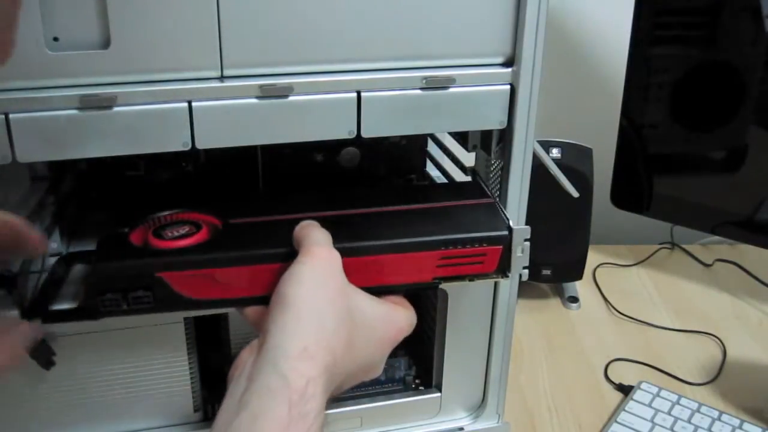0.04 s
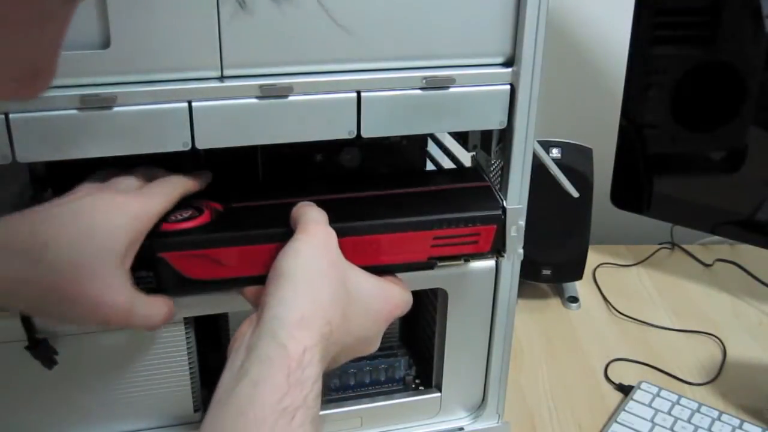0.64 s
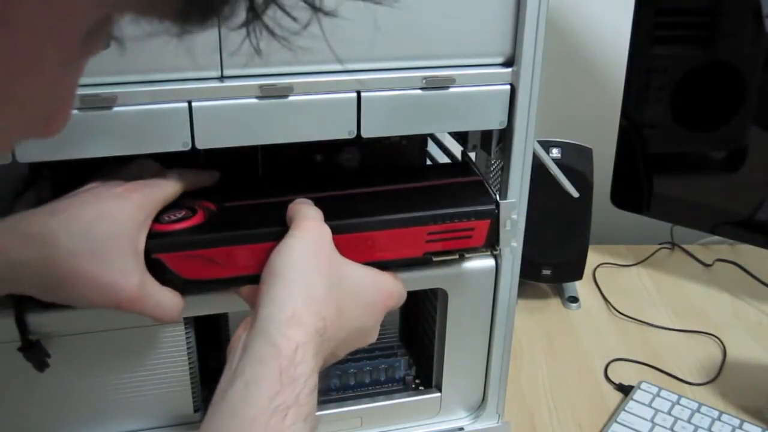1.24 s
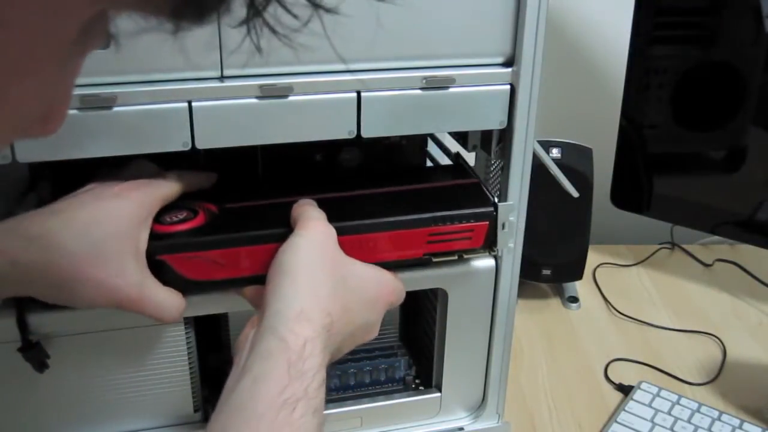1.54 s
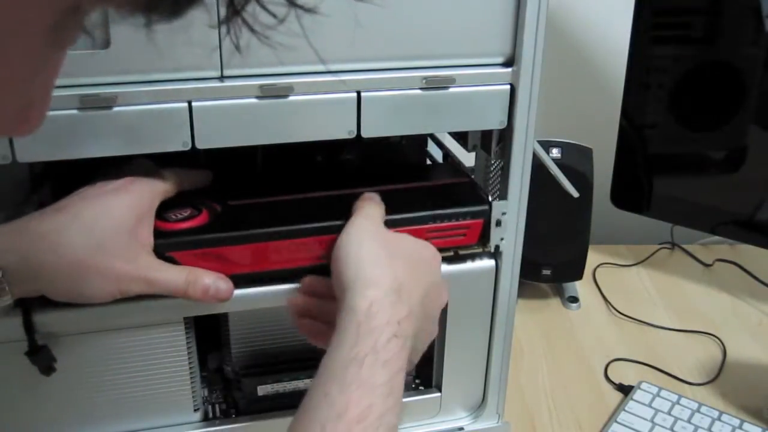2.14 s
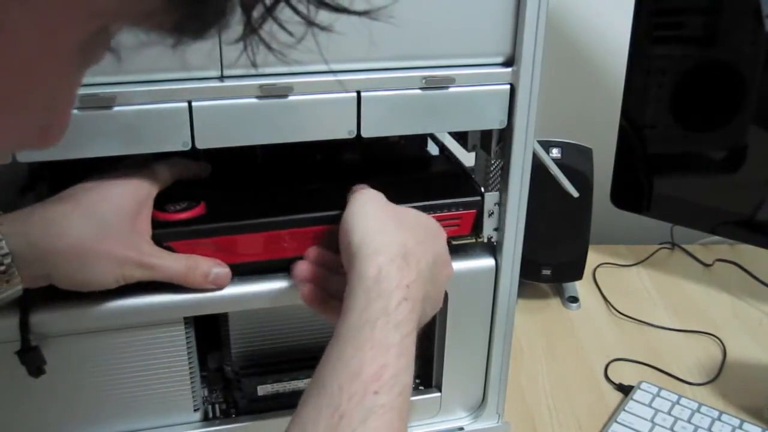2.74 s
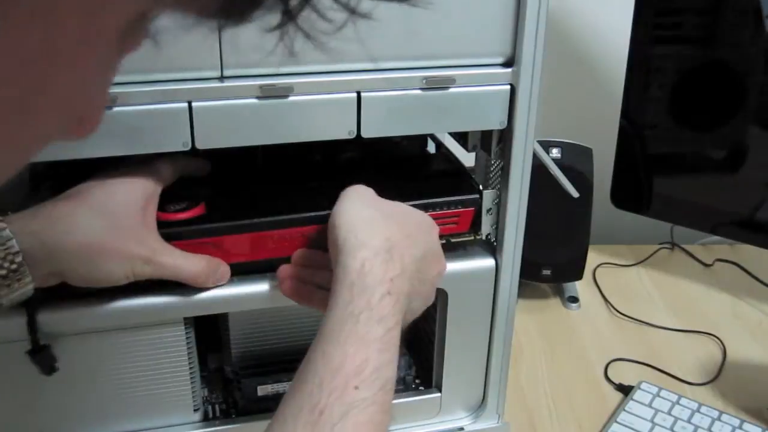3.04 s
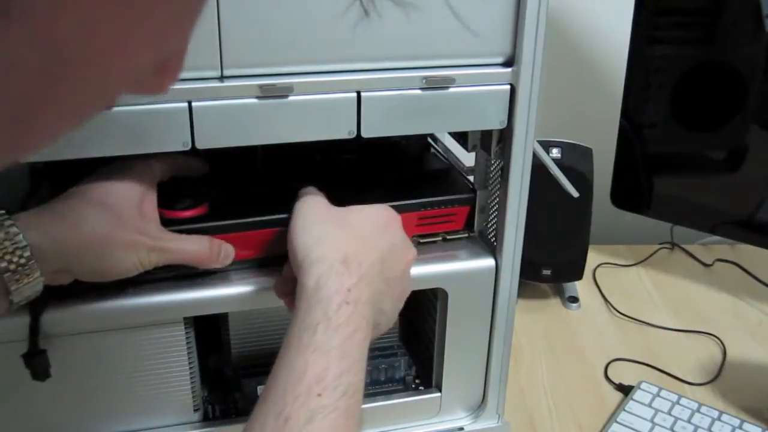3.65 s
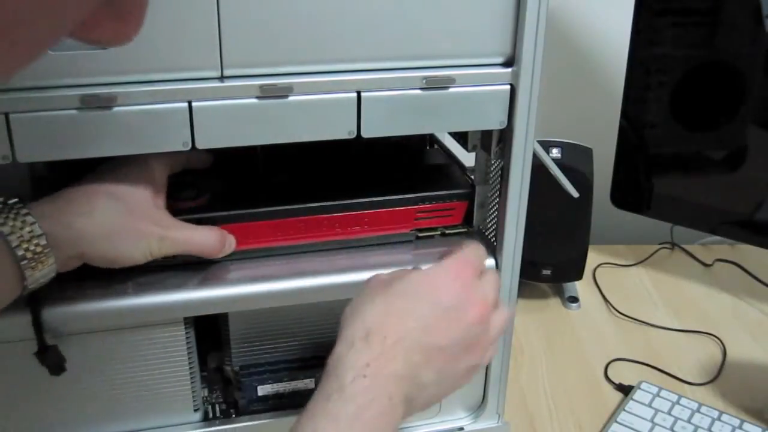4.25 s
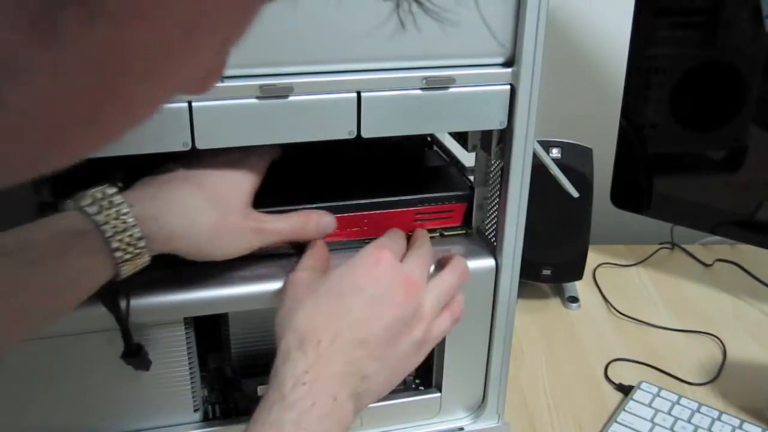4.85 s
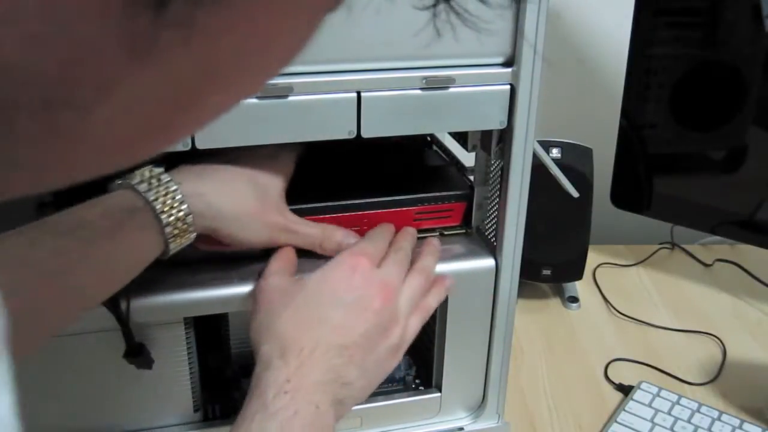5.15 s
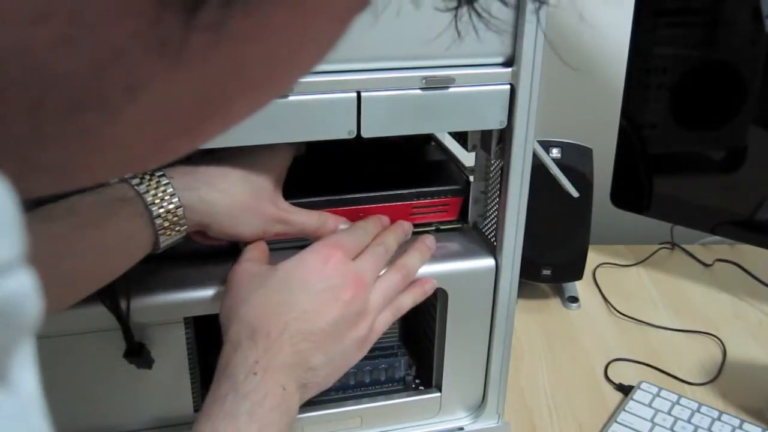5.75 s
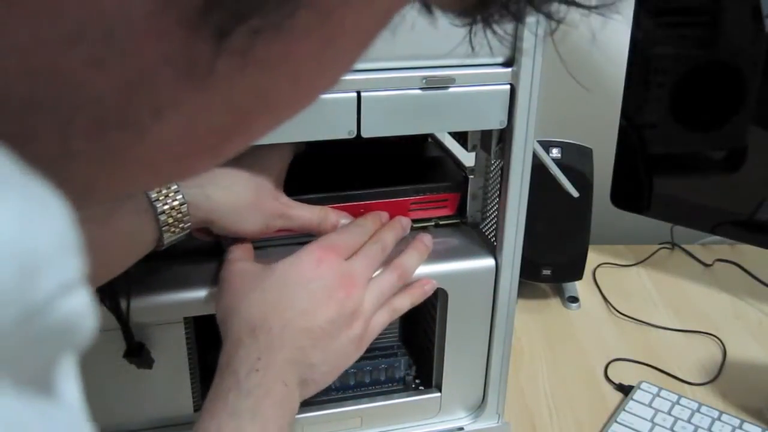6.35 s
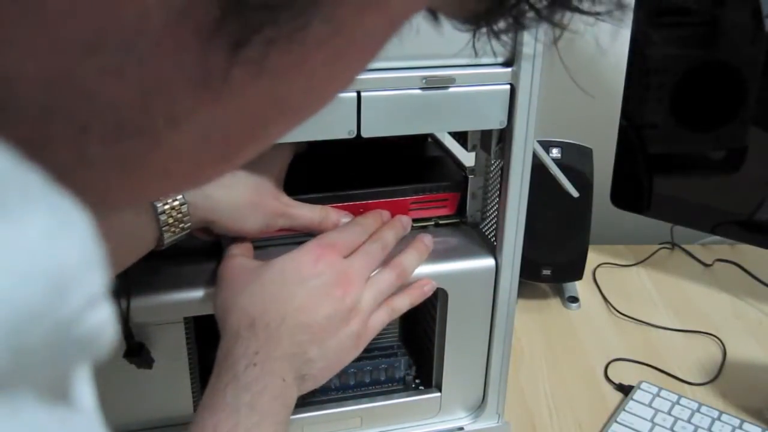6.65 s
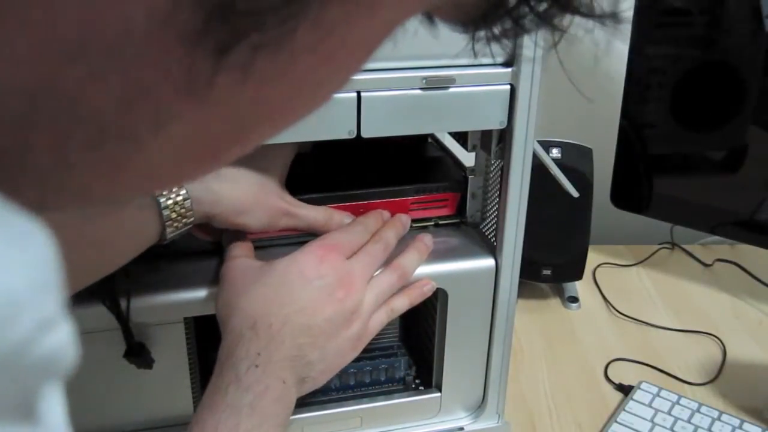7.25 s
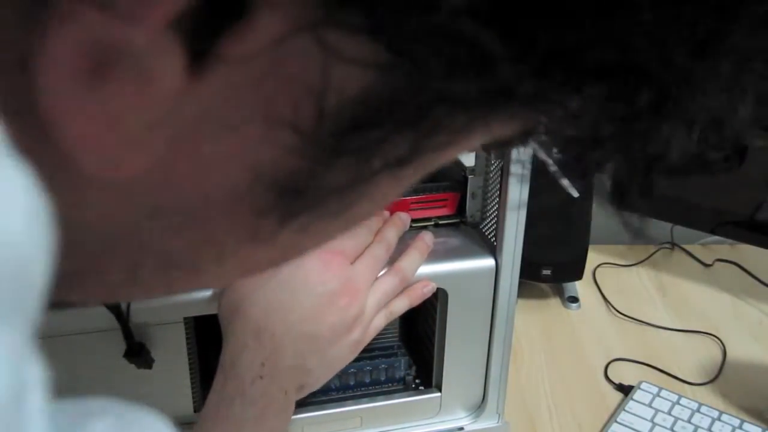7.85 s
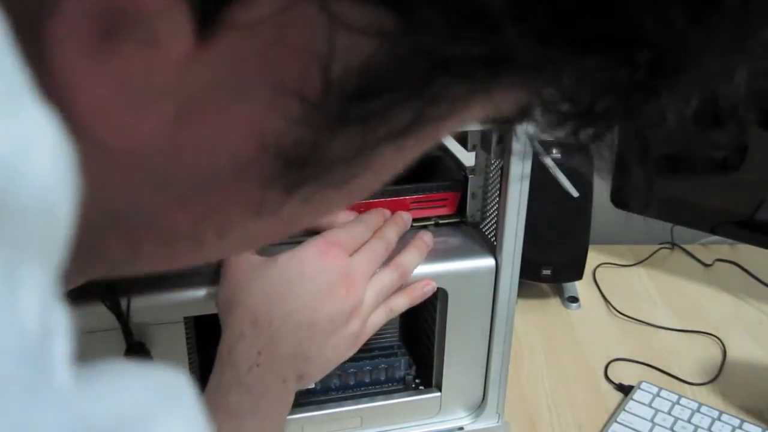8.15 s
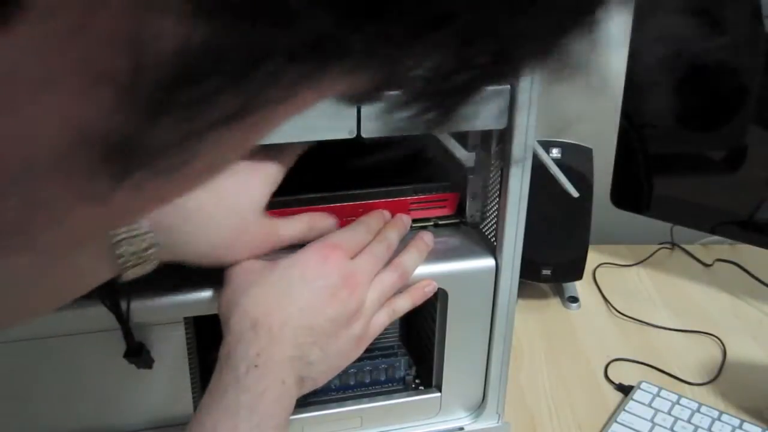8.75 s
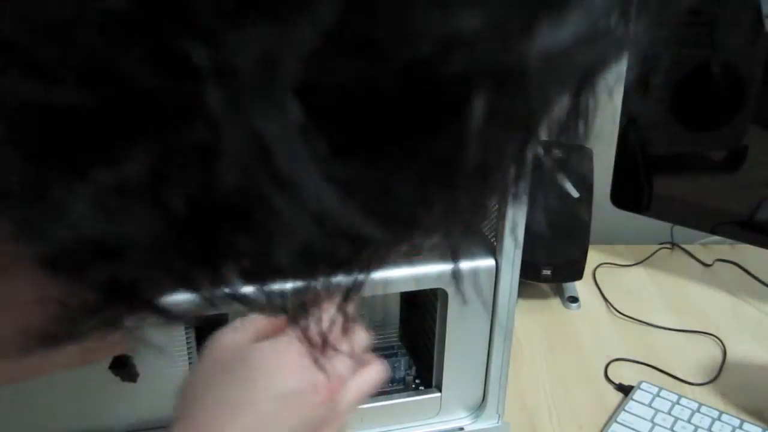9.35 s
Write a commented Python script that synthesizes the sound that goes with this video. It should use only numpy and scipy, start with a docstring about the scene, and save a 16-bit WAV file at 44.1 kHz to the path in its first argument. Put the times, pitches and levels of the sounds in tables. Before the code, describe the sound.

A graphics card is worked into a metal computer case. Light, uneven knocks and short scrapes come first, then sharper clicks and loud snaps from its steel bracket, each leaving a brief hollow ring in the case. After a quieter stretch with tiny squeaks, harder knocks follow, ending in a loud cluster of clacks. It sounds close by, in a quiet room with a faint fan hum and thin high tones.

```python
"""Fitting a graphics card into an aluminium case

The card knocks and scrapes on the casing, its steel bracket clicks and squeaks, and each contact
excites the modes of the hollow case. A harder touch reaches higher in frequency; more weight behind
it adds bass. A fan hums faintly in the room, and a limiter ducks the hardest snaps."""
import sys
import numpy as np
from scipy import signal
from scipy.fft import rfft, irfft
from scipy.io import wavfile
from scipy.ndimage import uniform_filter1d

SR = 44100
rng = np.random.default_rng(int(sys.argv[2]) if len(sys.argv) > 2 else 0)


def inscribe(sig):
    """Save sig as 16-bit PCM at rate SR to the path in sys.argv[1].

    A 1-D sig is mono; a 2-D sig holds one channel per row.
    Samples are clipped to [-1, 1] before scaling.
    """
    pcm = np.round(np.clip(np.atleast_2d(sig).T, -1, 1) * 32767)
    wavfile.write(sys.argv[1], SR, pcm.astype(np.int16))


N = 418509
RING_SAMPLES = 24000
# weight acts fully below HEAVY_HZ and fades out by LIGHT_HZ, or by THIN_HZ in a click of negative weight
HEAVY_HZ, LIGHT_HZ, THIN_HZ = 326, 1160, 3050

# spectrum of the steady background noise, which steps down above 2.5 kHz: (frequency [Hz], gain [dB])
BACKGROUND_SPECTRUM = [(25, -45), (100, -42.5), (180, -42), (400, -42), (700, -43.5), (1600, -46), (1950, -42.5),
                       (2500, -42.5), (2680, -51), (3500, -49), (6000, -56), (11000, -60), (15500, -67.5)]
# tones of the fan: (frequency [Hz], rms level [dB])
FAN_TONES = [(1863, -69), (2439, -72), (3445, -76)]
# Strength is a relative level, hardness the corner of the treble roll-off, weight a gain in the bass,
# and prominence the height of the resonance at the pitch of the part touched.
# the card bumps a panel:
# (time [s], strength [dB], hardness [Hz], weight [dB], pitch [Hz], prominence [dB])
CARD_KNOCKS = [(0.002, -3.5, 4300, 13, 690, -3), (0.025, 0.5, 2700, 7, 400, -9),
               (0.142, -5, 2800, 3, 650, 2), (0.48, 1, 4770, 8.5, 634, 8.5), (0.835, 0.5, 5100, 2, 600, 4),
               (0.849, 3, 3200, 1, 1050, 10), (0.923, -1.5, 4300, -1, 1260, 9),
               (0.984, -2.5, 3050, 4.5, 930, -1), (1.208, -16.5, 2500, -16, 1250, 19.5),
               (1.385, -17, 4500, 10, 452, 8), (2.129, 2.5, 6200, -4.5, 374, 3),
               (2.205, -6, 6980, 15, 700, 17), (2.242, 1, 4770, 12, 690, 11.5),
               (2.976, 6, 4570, 6.5, 1270, 11), (3.256, 5, 4960, 15.5, 704, 9),
               (3.2619, 22.5, 4460, 4, 770, 6), (3.3, -0.5, 437, 17, 241, 11),
               (3.76, 5.5, 4860, 8.5, 665, 9), (3.943, -2.5, 6300, 12.5, 346, 2),
               (4.372, -1.5, 450, 23.5, 234, 7), (4.383, 12, 2200, -7, 1234, 12),
               (4.407, 9, 3800, -2, 680, -3), (5.42, -2, 3950, 15.5, 386, 1),
               (5.455, -5, 2300, -26, 660, 14.5), (6.575, -3.5, 1620, 12, 420, 4.5),
               (6.816, -6.5, 3800, 8.5, 646, 10.5), (6.884, 20.5, 3550, -2, 750, 4.5),
               (7.092, 21, 2760, -4, 830, 4), (7.347, -10, 4270, 23, 348, 4),
               (7.371, -1, 2740, 3.5, 360, -8), (7.615, -9, 4830, 13.5, 660, 12),
               (7.678, 3, 2170, -0.5, 750, 6), (8.049, 13, 1870, 3, 616, 5.5),
               (8.511, 0, 4850, 6.5, 600, 9), (8.8609, 25, 3870, -7.5, 802, 5.5),
               (8.951, 12, 4540, -9, 1190, 4.5)]
# an edge slides:
# (start [s], end [s], strength [dB], hardness [Hz], weight [dB], pitch [Hz], swell [dB])
EDGE_SCRAPES = [(0.485, 0.567, -29.5, 6200, 6.5, 667, -7), (0.606, 0.636, -35.5, 9000, 9, 3630, -6),
                (1.935, 2.066, -47, 14300, -12, 5860, -8), (2.133, 2.215, -34.5, 6800, 12, 2750, -2),
                (2.339, 2.6, -43, 5040, 9.5, 700, 9), (3.21, 3.231, -35, 7000, 3, 1160, 2),
                (4.2, 4.293, -43, 8560, 10, 490, 9), (5.04, 5.131, -36, 9900, -2, 1260, 15),
                (5.353, 5.41, -43.5, 6140, -5, 656, 7), (7.389, 7.444, -41.5, 6700, 2, 330, 6)]
# bracket and latch snap: (time [s], strength [dB], hardness [Hz], weight [dB], pitch [Hz],
# prominence [dB], case ring [dB], crack relative to clack [dB])
BRACKET_CLICKS = [(0.617, -5, 8000, 21, 11700, 18, -1.5, -12), (1.857, -17.5, 10700, 19, 5000, 12, -3, -6),
                  (1.926, -12, 6900, 16, 3300, 10, -6, 4), (2.149, -4, 6000, -12, 2740, 16, -8, -4),
                  (2.169, -10, 6500, 0, 4900, 18, -6, -6), (2.203, -12, 7500, -4, 4350, 22, -3, -7),
                  (2.242, -4, 5950, 4, 3340, 17, -12, 2), (2.589, -7.5, 6000, -14, 2970, 4, -16, 2),
                  (2.769, -1.5, 5660, -20, 3570, 13, -5.5, 27), (3.243, -2.5, 5860, 14, 5030, 17, -4, -5),
                  (3.2613, 23, 8100, 9.5, 5300, 7, -7, 5), (4.289, 3.5, 15500, -32, 11000, 10, -7, -4),
                  (4.3108, 19.5, 13700, -7, 3470, 8, -9.5, -6), (4.333, 18.5, 7440, 11, 1320, 2.5, -6, -5),
                  (4.369, 16, 6540, 11, 1240, -4, -5.5, 8), (4.914, 4.5, 5800, 9.5, 2294, 21.5, -5, 3),
                  (5.329, -17, 10600, 16, 3380, 1, 4, 6), (5.48, -15, 9800, 1, 2660, 6, -14, -8),
                  (7.043, -8, 8040, 1, 2680, 10, -5, -5), (7.4603, 4.5, 4470, -4, 3090, 20.5, -2, 3),
                  (7.569, -10, 9600, 11, 4970, 15, 3, -1), (7.575, -1, 8970, -11, 4820, 14.5, -10, -2),
                  (8.765, 20.5, 4840, -12.5, 3680, 4, -4, -10), (8.781, 14, 4740, 3, 3460, 9, -7.5, 6),
                  (8.848, -7, 14100, -2, 9000, 19.5, -6, 6), (8.861, -6.5, 14100, 0, 12600, 20, -3, -5),
                  (8.93, -13.5, 13800, -22, 7390, 21.5, -6, -3)]
# the bracket rubs along its slot: (start [s], end [s], strength [dB], pitch [Hz])
BRACKET_SQUEAKS = [(2.201, 2.258, -40.5, 3350), (2.406, 2.419, -47, 1770), (5.085, 5.116, -33.5, 3050),
                   (5.11, 5.126, -30.5, 3200), (7.5, 7.525, -36, 3250)]
# modes of the panels and enclosed air: (frequency [Hz], relative level [dB], T60 [s])
CASE_MODES = [(165, 10, 0.15), (244.4, 9, 0.42), (330, 5.5, 0.42), (382.7, 5.5, 0.42), (577, -3, 0.44),
              (657, 9, 0.41), (804, -3.5, 0.66), (849, 1, 0.37), (956, 6, 0.33), (1136, 7.5, 0.27),
              (1332, 7.5, 0.39), (2100, -3.5, 0.59), (3402, -7, 0.24), (3576, -17, 0.23),
              (10537, -12, 0.22)]
# modes of the steel bracket: (frequency [Hz], nominal prominence [dB])
BRACKET_MODES = [(1900, 7), (2700, -4), (3020, -1), (3400, 5.5), (3900, 5.5), (4250, 4.5), (4880, -0.5),
                 (5400, 2), (6450, 3), (7550, 4), (10540, 6.5)]
# partials of a panel and of a steel tab: (frequency / pitch [ratio], share of prominence [ratio])
PANEL_PARTIALS = [(1, 1), (1.79, 0.77)]
TAB_PARTIALS = [(0.825, 0.5), (1, 1), (1.3, 0.19), (1.6, 0.63), (2.55, 0.44)]
# damping by band: (frequency [Hz], nominal T60 of the struck part [s], T60 of case and room [s])
DECAY_TIMES = [(136, 0.16, 0.88), (386, 0.15, 0.49), (950, 0.096, 0.59), (1540, 0.071, 0.54),
               (3360, 0.038, 0.43), (4860, 0.035, 0.42), (7950, 0.015, 0.34), (13000, 0.016, 0.41)]
# radiation efficiency of the metal: (frequency [Hz], gain [dB])
METAL_RADIATION = [(25, -43), (90, -25), (170, -9.5), (245, -10.5), (283, -14.5), (345, 1), (520, 0),
                   (1300, 5), (5500, 2.5), (7500, 0.5), (11500, 8.5), (13800, 8), (16000, -5)]
# two-sided frequency axis of the contact spectra
BINS_HZ = abs(np.fft.fftfreq(2 * RING_SAMPLES, 1 / SR))


def amp(db):
    """Amplitude ratio of a level in decibels."""
    return 10 ** (np.asarray(db) / 20)


def unit_energy(x):
    """Normalisation to an energy of one."""
    return x / np.sqrt(np.sum(x ** 2) + 1e-20)


def curve(points, hz):
    """Interpolation of (frequency [Hz], value) points on a logarithmic frequency axis."""
    point_hz, values = np.transpose(points)
    return np.interp(np.log(hz + 1), np.log(point_hz + 1), values)


def add(mix, start_s, sound):
    """Superposition: a sound adds to the mix from its start time on."""
    part = mix[max(0, round(start_s * SR)):][:len(sound)]
    part += sound[:len(part)]


def contact_spectrum(strength_db, hard_hz, weight_db, fall_db_per_octave, thin=False):
    """Contact stiffness sets the bandwidth, and the weight behind it the bass; in dB."""
    bass = curve([(HEAVY_HZ, 1), (THIN_HZ if thin else LIGHT_HZ, 0)], BINS_HZ)
    octaves_above = np.log2(np.hypot(1, BINS_HZ / hard_hz))
    return strength_db + weight_db * bass - fall_db_per_octave * octaves_above


def resonance(pitch_hz, prominence_db, width=0.025):
    """A damped mode gives a Lorentzian peak, broader at higher pitch; in dB."""
    half_width_hz = width * pitch_hz + 24
    detuning = (BINS_HZ - pitch_hz) / half_width_hz
    return 20 * np.log10(1 + (amp(prominence_db) - 1) / (1 + detuning ** 2))


def partials(table, pitch_hz, prominence_db, width=0.025):
    """A metal part resonates at inharmonic ratios of its pitch; in dB."""
    return sum(resonance(ratio * pitch_hz, share * prominence_db, width) for ratio, share in table)


def bracket_spectrum():
    """Each point of contact excites the bracket's modes in different proportions; in dB."""
    shares = rng.uniform(0, 1.18, len(BRACKET_MODES))
    return sum(resonance(hz, db * share, width=0.0034) for (hz, db), share in zip(BRACKET_MODES, shares))


def dense_modes(t60s):
    """Modal overlap: crowded modes merge into noise, each band decaying at its own rate."""
    t = np.arange(RING_SAMPLES) / SR
    hz = np.fft.rfftfreq(RING_SAMPLES, 1 / SR)
    centres = np.transpose(DECAY_TIMES)[0]
    shares = np.array([curve(np.c_[centres, band], hz) for band in np.eye(len(centres))])
    noise = rng.standard_normal((len(centres), RING_SAMPLES))
    bands = irfft(rfft(noise) * np.sqrt(shares))
    return sum(unit_energy(band * 1000 ** (-t / t60)) * np.sqrt(share.mean())
               for band, share, t60 in zip(bands, shares, t60s))


def case_ring(modes_db=-5, build_s=0.0037, cutoff_hz=10500):
    """Impulse response of the case: distinct damped modes in a dense, low-passed tail."""
    t = np.arange(RING_SAMPLES) / SR
    hz, db, t60 = np.transpose(CASE_MODES)[:, :, None]
    modes = amp(db) * 1000 ** (-t / t60) * np.sin(2 * np.pi * (hz * t + rng.random(hz.shape)))
    tail = dense_modes(np.transpose(DECAY_TIMES)[2])
    ring = tail + amp(modes_db) * unit_energy(modes.sum(0)) / 2
    build_up = 1 - np.exp(-t / build_s)
    return signal.lfilter(*signal.butter(3, cutoff_hz, fs=SR), ring * build_up)


def radiate(vibration, spectrum_db):
    """Radiation: a minimum-phase filter applies the contact's spectrum and the metal's efficiency."""
    gain = amp(np.maximum(spectrum_db + curve(METAL_RADIATION, BINS_HZ), -100))
    response = np.exp(np.conj(signal.hilbert(np.log(gain))))
    return irfft(rfft(vibration, len(BINS_HZ)) * response[:RING_SAMPLES + 1])


def sound_in_case(contact, drive, spectrum_db, ring_db, peaks_db, peak_share=0.73):
    """Forced vibration: a part sounds and drives the case, which keeps a share of its resonances."""
    direct = radiate(contact, spectrum_db + peaks_db)
    ring = signal.fftconvolve(drive, case_ring())
    return direct + amp(ring_db) * radiate(ring, spectrum_db + peak_share * peaks_db)


def impact(rise_s, crack_db, crack_s, coupling, decay_scale=1.0):
    """Impact gives a crack and a decaying clack; that blow and an impulse together drive the case."""
    t = np.arange(RING_SAMPLES) / SR
    rise = 1 - np.exp(-t / rise_s)
    crack = unit_energy(rng.standard_normal(RING_SAMPLES) * np.exp(-t / crack_s) * rise)
    clack = unit_energy(dense_modes(decay_scale * np.transpose(DECAY_TIMES)[1]) * rise)
    blow = unit_energy(clack + amp(crack_db) * crack)
    drive = np.sqrt(coupling) * blow + np.sqrt(1 - coupling) * signal.unit_impulse(RING_SAMPLES)
    return blow, drive


def fan(waver_hz=2.4):
    """Aerodynamic noise: a broadband rush of air with a few faint, wavering tones."""
    t = np.arange(N) / SR
    air_gain = amp(curve(BACKGROUND_SPECTRUM, np.fft.rfftfreq(N, 1 / SR)))
    out = irfft(rfft(rng.standard_normal(N)) * air_gain, N)
    knots = np.linspace(0, t[-1], 100)
    for hz, db in FAN_TONES:
        drift_hz = waver_hz * np.interp(t, knots, rng.standard_normal(len(knots)))
        out += amp(db) * np.sqrt(2) * np.sin(2 * np.pi * np.cumsum(hz + drift_hz) / SR)
    return out


def knocks(gain_db=-3.5, rise_s=0.0015, ring_db=-3):
    """Impact excitation: the heavy card bumps a panel, which clacks and sets the hollow case ringing."""
    out = np.zeros(N)
    for time, strength_db, hard_hz, weight_db, pitch_hz, prominence_db in CARD_KNOCKS:
        blow, drive = impact(rise_s, crack_db=-7, crack_s=0.0051, coupling=0.48, decay_scale=1.22)
        spectrum_db = contact_spectrum(strength_db, hard_hz, weight_db, fall_db_per_octave=19)
        peaks_db = partials(PANEL_PARTIALS, pitch_hz, prominence_db)
        add(out, time - rise_s / 2, sound_in_case(blow, drive, spectrum_db, ring_db, peaks_db))
    return amp(gain_db) * out


def scrapes(gain_db=-1, slips_per_s=170, spread_db=7, slip_s=0.0036, fade_s=0.0027, ring_db=-2):
    """Stick-slip friction: a sliding edge releases uneven bursts of noise into the metal."""
    out = np.zeros(N)
    for start, end, strength_db, hard_hz, weight_db, pitch_hz, swell_db in EDGE_SCRAPES:
        t = np.arange(round((end - start) * SR)) / SR
        count = int(np.ceil(t[-1] * slips_per_s)) + 1
        jitter, chance = rng.random((2, RING_SAMPLES))[:, :count]
        grit = rng.standard_normal(RING_SAMPLES)[:len(t)]
        # each slip falls at a random moment of its own time slot
        onsets = ((np.arange(count) + jitter) / count * len(t)).astype(int)
        slip_db = spread_db * np.minimum(-np.log(chance), 2)
        slip_energy = np.bincount(onsets, amp(slip_db) ** 2, len(t))
        power = signal.lfilter([1], [1, -np.exp(-1 / (slip_s * SR))], slip_energy)
        force = amp(swell_db * t / t[-1]) * np.sqrt(power)
        fade = np.clip(np.minimum(t, t[-1] - t) / fade_s, 0, 1)
        rub = unit_energy(grit * force * fade) * np.sqrt(len(t))
        spectrum_db = contact_spectrum(strength_db, hard_hz, weight_db, fall_db_per_octave=29)
        spectrum_db += bracket_spectrum()
        peaks_db = resonance(pitch_hz, prominence_db=9)
        add(out, start, sound_in_case(rub, rub, spectrum_db, ring_db, peaks_db))
    return amp(gain_db) * out


def clicks(gain_db=-5, rise_s=0.0006, tilt_db_per_octave=3):
    """Elastic release: thin steel snaps past an edge, cracks and rings briefly at its partials."""
    out = np.zeros(N)
    tilt_db = tilt_db_per_octave * np.log2(np.maximum(BINS_HZ, HEAVY_HZ) / LIGHT_HZ)
    for time, strength_db, hard_hz, weight_db, pitch_hz, peak_db, ring_db, crack_db in BRACKET_CLICKS:
        snap, drive = impact(rise_s, crack_db, crack_s=0.0052, coupling=0.24)
        spectrum_db = contact_spectrum(strength_db, hard_hz, weight_db, fall_db_per_octave=29,
                                       thin=weight_db < 0)
        spectrum_db += tilt_db + bracket_spectrum()
        peaks_db = partials(TAB_PARTIALS, pitch_hz, peak_db)
        add(out, time - rise_s / 2, sound_in_case(snap, drive, spectrum_db, ring_db, peaks_db))
    return amp(gain_db) * out


def squeaks(ring_db=-4):
    """Friction excites resonance: steel rubs on steel in one swell and sings at the tab's partials."""
    out = np.zeros(N)
    for start, end, strength_db, pitch_hz in BRACKET_SQUEAKS:
        arch = np.sin(np.linspace(0, np.pi, round((end - start) * SR)))
        rub = rng.standard_normal(RING_SAMPLES)[:len(arch)] * arch
        spectrum_db = contact_spectrum(strength_db, hard_hz=6500, weight_db=-14, fall_db_per_octave=20)
        spectrum_db += bracket_spectrum()
        peaks_db = partials(TAB_PARTIALS, pitch_hz, prominence_db=18, width=0.047)
        add(out, start, sound_in_case(rub, rub, spectrum_db, ring_db, peaks_db))
    return out


def scene():
    """Superposition of the contacts and the fan in one channel."""
    return (knocks() + clicks() + scrapes() + squeaks() + fan())[None]


def record(dry, limit_db=-15.5, recover_db_per_s=140, attack_s=0.0023, ceiling=0.7, cutoff_hz=16300):
    """Limiting: gain drops after the hardest peaks and recovers fast; soft clip and low-pass follow."""
    power = uniform_filter1d(dry[0] ** 2, size=220)  # 5 ms mean
    excess_db = np.maximum(10 * np.log10(abs(power) + 1e-12) - limit_db, 0)
    recovery_db = np.arange(N) * recover_db_per_s / SR
    held_db = np.maximum.accumulate(excess_db + recovery_db) - recovery_db
    pole = np.exp(-1 / (attack_s * SR))
    duck_db = signal.lfilter([1 - pole], [1, -pole], held_db)
    limited = ceiling * np.tanh(dry / amp(duck_db) / ceiling)
    low_pass = signal.firwin(301, cutoff_hz, window=("kaiser", 9), fs=SR)
    return signal.oaconvolve(limited, low_pass[None], "same")


dry = scene()
out = record(dry)
inscribe(out)
```